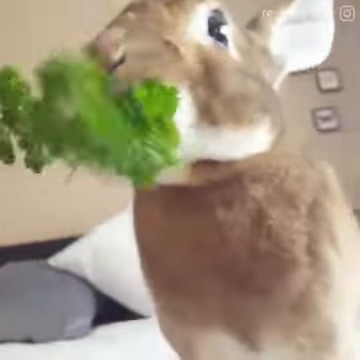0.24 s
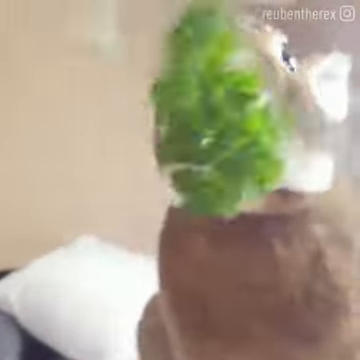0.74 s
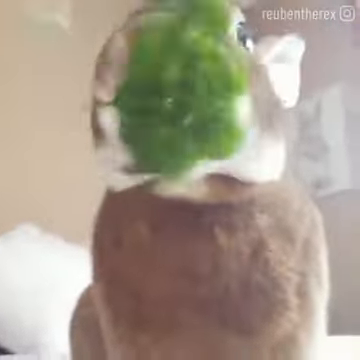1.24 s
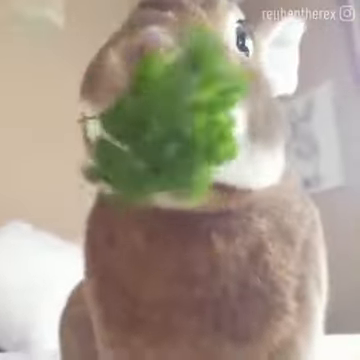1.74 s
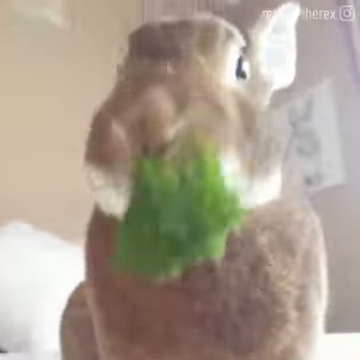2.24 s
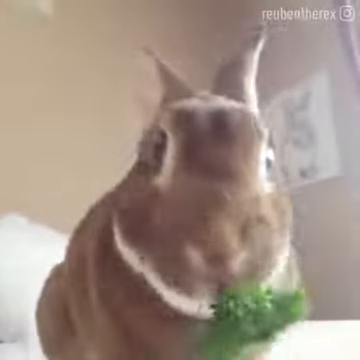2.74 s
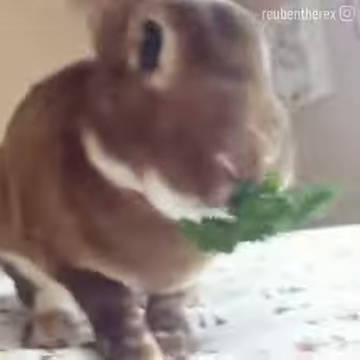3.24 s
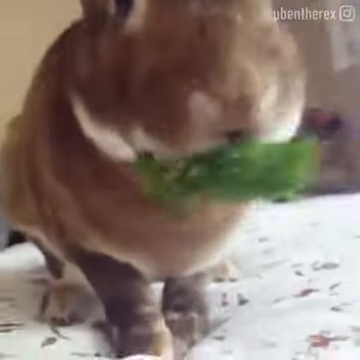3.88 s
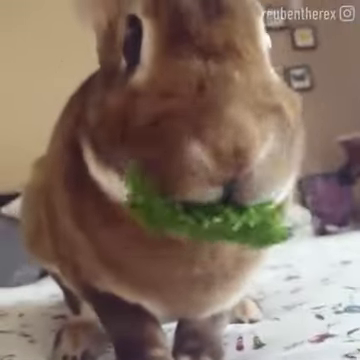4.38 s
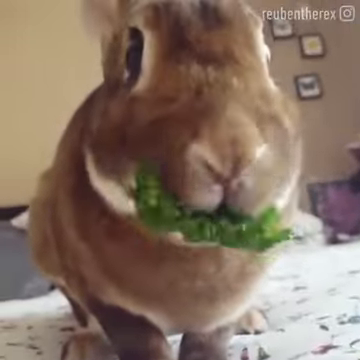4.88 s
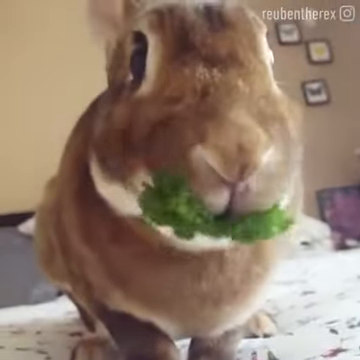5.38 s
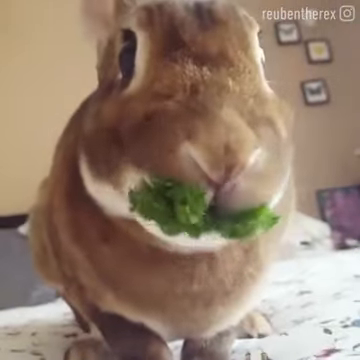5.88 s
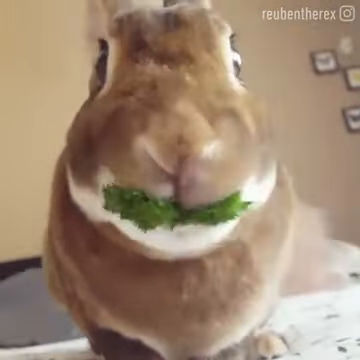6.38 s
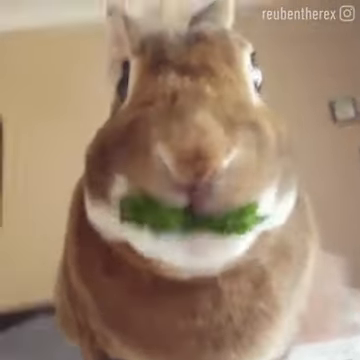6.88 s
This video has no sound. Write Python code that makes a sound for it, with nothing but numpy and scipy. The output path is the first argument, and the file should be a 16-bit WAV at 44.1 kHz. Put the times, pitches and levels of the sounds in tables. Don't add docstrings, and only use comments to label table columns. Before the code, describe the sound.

A rabbit eats leafy greens a hand's breadth from a stereo microphone in a quiet bedroom, over a low wavering air hum and faint steady hiss. From 0 to 2.2 seconds it bites about four times a second: bright, crackling leaf tears, thick stems snapping in little clusters and a small hollow crunch of the closed mouth, strongest near 0.1 and 1.0. From about 2.3 to 4 the head is lowered and bites become softer, drier and shorter-tailed, with thin clean stem ticks and muffled pops. From 4.1 to 7 the crunches firm up again at the same steady pace. Between bites, lips draw leaves in with soft rustles; faint low thumps come from jolted bedding. At 6.73 a fingertip knocks the microphone: one abrupt, very loud click with a low thump, mainly left, gone almost instantly. Two last bites follow, leaning left.

```python
import sys
import numpy as np
from scipy import signal
from scipy.io import wavfile
from scipy.ndimage import uniform_filter1d

SR = 44100
rng = np.random.default_rng(int(sys.argv[2]) if len(sys.argv) > 2 else 0)


def volts_from_db(level):
    exponent = np.asarray(level, float) / 20
    return 10 ** exponent


def digitize_waveform(pressure):
    field = np.atleast_2d(pressure).T
    bounded = np.clip(field, -1, 1)
    quanta = np.round(bounded * 32767).astype(np.int16)
    wavfile.write(sys.argv[1], SR, quanta)


N = 313992

# frequency in Hz, level in dB per Hz.
ROOM_SPECTRUM = [(15, -23), (25, 9.5), (48, -7.5), (112, -10), (417, -17.5), (893, -20.5), (1190, -22.5),
                 (1360, -20), (2840, -27.5), (4000, -28.5), (6760, -29.5), (7920, -30.5), (12100, -32),
                 (13400, -36.5)]
ROOM_DB = -64
# frequency in Hz, correlation from 0 to 1.
PORT_LIKENESS = [(60, 0.95), (130, 0.85), (290, 0.73), (640, 0.59), (1400, 0.15), (3080, 0.45),
                 (6780, 0.16), (14900, 0.17)]
# time in seconds, level in dB.
HUM_DRIFT = [(0.0, -68.5), (0.4, -71.5), (0.71, -64.5), (1.21, -71), (1.64, -69.5), (2.38, -69),
             (3.03, -66.5), (4.9, -71.5), (5.15, -70.5), (5.61, -68.5), (6.09, -71.5), (6.39, -69),
             (6.76, -72), (7.0, -68.5), (7.12, -75)]
# centre with the head up in Hz, centre with it down in Hz, half width in Hz, depth in dB.
REFLECTION_DIPS = [(3750, 4300, 130, -4), (7950, 6300, 150, -2.5), (10750, 11200, 150, -3.5)]
# frequency in Hz, width in Hz, level in dB.
ROOM_MODES = [(81.7, 32, -79.5), (131.3, 30, -77.5), (223, 20, -80.5)]
# start in seconds, level in dB, frequency in Hz.
BEDDING_THUDS = [(0.099, -62, 96.9), (0.69, -65, 110), (0.989, -59, 105), (1.184, -55, 121),
                 (1.65, -59, 122), (2.129, -59, 121), (2.23, -59, 80.7), (2.829, -62, 86.1),
                 (3.131, -57, 86.1), (3.568, -59.5, 127), (4.014, -62, 94.2), (4.921, -65, 102),
                 (5.154, -66, 110), (5.449, -56, 132)]
# frequency in Hz, level in dB, 60 dB decay in seconds.
CASE_RINGS = [(1420, -31, 0.017), (1700, -30.5, 0.012), (1850, -19, 0.0058), (4510, -33, 0.0075),
              (2310, -27, 0.0085), (5300, -29, 0.0027), (6260, -44, 0.0024), (8800, -36.5, 0.0031)]
# time after the knock in seconds, level in dB.
RING_STARTS = [
    (-.0027, -20),
    (-.0017, -13),
    (-.0009, -9),
    (-.0001, 0),
    (.003, -17),
]
# time in seconds, head lowered from 0 to 1, left over right fizz in dB.
HEAD = [
    (0, 0.02, 2),
    (1, 0.27, 4),
    (2.2, 0.16, 1.5),
    (2.6, 1, -0.5),
    (4.5, 0.93, -1.5),
    (7.2, 0.97, 3),
]
# frequency in Hz, level in dB per Hz.
FIZZ_UP = [(1650, -10), (2800, -9), (3180, -7.5), (3550, -10.5), (3850, -18), (4300, -8), (4740, -2),
           (5430, -6.5), (7170, 0.5), (7690, -5), (7970, -18), (8380, -8.5), (9330, 0), (10700, -13.5),
           (11600, -5), (13100, -8), (15400, -19.5)]
FIZZ_DOWN = [(1650, -39), (2800, -1.5), (3400, -5), (4180, -4.5), (5000, -7), (5440, -6.5), (6070, -1.5),
             (6730, 3), (8000, -1), (8820, -0.5), (10900, -2.5), (11900, -3.5), (13600, -5.5),
             (14600, -11.5)]
# frequency in Hz, level in dB per Hz.
MOUTH_UP = [(180, -52), (300, -14.5), (483, -6.5), (588, -5.5), (956, -5.5), (1060, -5), (1840, -8),
            (2010, -10.5), (2380, 1), (3200, -13.5), (4160, -41), (7040, -120)]
MOUTH_DOWN = [(180, -42), (300, -7.5), (468, -18.5), (528, -9), (724, -8), (1090, -7.5), (1820, -1),
              (2030, -8.5), (2550, -18), (3200, -11), (4160, -18.5), (7040, -120)]
# time in seconds, tick in dB, mouth ring in dB, ring in Hz.
STEM_BREAKS = [(0.11, -44, -65, 690), (0.1251, -39, -44, 784), (.136, -47, -46, 1390),
               (0.3446, -53.5, -41, 2300), (0.356, -62, -43, 2650), (0.371, -47, -59, 1860),
               (0.5312, -44.5, -61, 1310), (.5275, -54, -65, 2000), (.552, -56, -65, 860),
               (0.5585, -45, -52, 2560), (.5635, -52, -50, 2310), (.766, -43.5, -52, 840),
               (0.9784, -47, -56, 2310), (0.9964, -41.5, -41.5, 700), (1.007, -48, -39.5, 960),
               (1.2075, -53, -70, 7000), (1.2125, -52, -58, 7000), (1.213, -48.5, -76, 4480),
               (1.2193, -57, -61, 2300), (1.2355, -50, -62, 2400), (1.2535, -57, -57, 2110),
               (1.3207, -52.5, -56.5, 1460), (1.4364, -51, -63, 1700), (1.444, -52.5, -49, 1080),
               (1.679, -50.5, -51.5, 1670), (1.7105, -51.5, -51.5, 774), (1.73, -58, -59, 1020),
               (1.9216, -66, -58, 2330), (1.9345, -56, -49.5, 780), (1.955, -52.5, -48.5, 1510),
               (2.141, -52, -53, 930), (4.1189, -44.5, -45, 1960), (4.14, -55, -51, 1850),
               (5.806, -59, -59, 1910), (5.8147, -53.5, -62, 1650), (6.25, -50.5, -50, 1740),
               (6.787, -61, -49, 1420)]
# time in seconds, tick in dB, mouth ring in dB, ring in Hz.
STEM_CUTS = [(.3323, -62, -50, 2080), (.9876, -54, -48, 2050), (1.9018, -47.5, -45, 1720),
             (2.5325, -66, -56, 3640), (2.6175, -53.5, -72, 1740), (2.6586, -51.5, -41, 2075),
             (2.708, -58, -45.5, 1730), (3.1632, -51.5, -45, 1850), (3.6019, -45.5, -55, 2630),
             (3.6207, -51.5, -67, 880), (3.6495, -44, -43, 4000), (4.0548, -57, -55, 1890),
             (4.316, -53, -52, 1610), (4.529, -48, -46.5, 3350), (4.633, -63, -58, 3930),
             (4.7945, -54, -68, 1670), (4.8034, -50, -51, 1590), (4.813, -64, -60, 1830),
             (5.008, -42.5, -57, 2210), (5.0661, -48.5, -48, 805), (5.4647, -62, -58, 1830),
             (5.5155, -52.5, -51, 1700), (5.7504, -47, -57, 880), (5.754, -54, -57, 2000),
             (5.9864, -53.5, -55, 1680), (6.489, -42.5, -54, 4060), (6.636, -62, -55, 2570),
             (6.7692, -51.5, -43, 1140), (6.992, -56, -65, 1870), (7.0274, -54, -50, 2010),
             (7.046, -65, -64.5, 970)]
# time in seconds, mouth ring in dB, ring in Hz.
STEM_POPS = [(.1457, -52, 780), (1.4529, -51, 1570), (1.4635, -50, 1410), (2.382, -56, 1870),
             (2.6516, -49, 1890), (2.67, -45.5, 1890), (2.6932, -48, 1560), (2.717, -50, 1660),
             (3.4253, -55, 1610), (4.1137, -51, 1950), (4.1183, -44.5, 220), (4.3048, -54, 1780),
             (4.351, -56, 1460), (4.534, -47, 1520), (4.561, -46.5, 1710), (4.5753, -44, 1600),
             (4.82, -46, 1830), (4.833, -51, 1500), (5.042, -47, 1500), (5.051, -45, 1850),
             (5.7626, -54, 810), (5.7978, -48.5, 1940), (6.0005, -53, 1230), (6.2843, -48, 1950),
             (6.5272, -53, 1370), (6.76, -46, 1590)]
# middle in seconds, half length in seconds, leaf rustle in dB.
LIP_PULLS = [(0.284, 0.011, -61), (0.477, 0.032, -63.5), (0.73, 0.035, -71), (0.925, .025, -69),
             (1.177, 0.036, -62.5), (1.387, 0.032, -72), (1.588, 0.05, -70), (1.849, 0.031, -64.5),
             (2.084, 0.045, -64), (2.542, 0.025, -73), (2.737, 0.025, -68), (3.083, 0.018, -72),
             (3.566, 0.034, -70), (4.077, 0.021, -59.5), (4.38, 0.019, -65.5), (4.775, 0.03, -61),
             (4.973, 0.033, -67.5), (5.23, 0.046, -65), (5.447, 0.017, -63), (5.69, 0.013, -64.5)]
# jaw closes at seconds, grind length in seconds, leaf fizz in dB, mouth crunch in dB.
BITES = [(0.122, 0.015, -51.5, -50.5), (0.32, 0.031, -55, -53), (0.534, 0.034, -54.5, -51),
         (0.748, 0.053, -55.5, -56), (0.983, 0.014, -48, -48.5), (1.21, 0.043, -53.5, -57.5),
         (1.439, 0.015, -52, -55.5), (1.662, 0.049, -56, -58.5), (1.904, 0.024, -55, -55),
         (2.13, 0.012, -55, -55.5), (2.348, 0.099, -66.5, -63), (2.629, 0.074, -61, -55.5),
         (2.894, 0.055, -75, -62.5), (3.122, 0.068, -60, -56), (3.344, 0.074, -64.5, -59),
         (3.6, 0.069, -63, -60), (3.809, 0.099, -69.5, -65), (4.112, 0.023, -58, -53),
         (4.29, 0.065, -63.5, -60), (4.541, 0.03, -59, -53), (4.804, 0.023, -57, -51.5),
         (4.996, 0.075, -62.5, -56), (5.259, 0.066, -65.5, -61), (5.496, 0.058, -59.5, -57.5),
         (5.745, 0.075, -62.5, -54.5), (5.985, 0.064, -57.5, -55), (6.247, 0.043, -57, -54.5),
         (6.511, 0.039, -61, -57.5), (6.766, 0.035, -55.5, -52.5), (6.98, 0.068, -63, -60)]
# head up in dB/s, head down in dB/s.
RELEASE_DB_PER_S = ((248, 570), (220, 680))

CLOSE_DB_PER_S = 1095
SWELL_DB = (0, 7.5)
SETTLE_DB, SETTLE_SHARE = -8, 0.59
PULL_CRUNCH_DB = -10.5
BREAK_MS = (1.44, 0.86)
CUT_MS, POP_MS, POP_TICK_DB = 0.63, 1.2, -8.5
KNOCK_S, THUD_S = 6.73268, .008


def read(points, hz):
    f, value = np.transpose(points)
    return np.interp(np.log(hz + 1), np.log(f + 1), value)


def evened(x):
    return x / np.sqrt(np.mean(x ** 2) + 1e-20)


def highpass(x, hz):
    return signal.sosfilt(signal.butter(2, hz, "high", fs=SR, output="sos"), x)


def colour(points):
    level_db = np.maximum(read(points, abs(np.fft.fftfreq(4096, 1 / SR))), -90)
    log_gain = np.log(volts_from_db(level_db))
    taps = np.fft.ifft(np.exp(np.conj(signal.hilbert(log_gain)))).real[:1024]
    return taps / np.linalg.norm(taps)


def posture(column):
    head = np.array(HEAD)
    return np.interp(np.arange(N) / SR, head[:, 0], head[:, column])


def head_low():
    return np.clip(posture(column=1), 0, 1)


def by_head(drive, up, down):
    low = head_low()
    raised = signal.oaconvolve(drive * np.sqrt(1 - low), colour(up))
    lowered = signal.oaconvolve(drive * np.sqrt(low), colour(down))
    return (raised + lowered)[:N]


def scatter(x, wet, t60):
    t = np.arange(2000) / SR
    taps = rng.standard_normal((2, len(t))) * volts_from_db(-60 * t / t60)
    taps *= np.sqrt(np.clip(wet, 0, 1)) / np.linalg.norm(taps, axis=1, keepdims=True)
    taps[:, 0] = np.sqrt(1 - np.clip(wet, 0, 1))
    return signal.oaconvolve(x[None], taps, axes=1)[:, :N]


def crackle(per_s, spread_db, clump_db, clump_s):
    hit, size = rng.random(N), rng.exponential(1, N)
    sign, clump = rng.standard_normal(N), rng.standard_normal(N)
    span = max(int(clump_s * SR), 2)
    clump = evened(uniform_filter1d(uniform_filter1d(clump, span), span))
    size_db = spread_db * np.minimum(size, 4) + clump_db * clump
    return evened((hit < per_s / SR) * np.sign(sign) * volts_from_db(size_db))


def patchy(x, patch_db):
    z = signal.stft(x, nperseg=256)[2]
    patches = rng.standard_normal(z.shape[::-1]).T
    patches = uniform_filter1d(uniform_filter1d(patches, size=12, axis=0), size=5, axis=1)
    gain_db = patch_db * evened(patches) - patch_db ** 2 / 8.9
    return signal.istft(z * volts_from_db(gain_db), nperseg=256)[1][:N]


def room_tone():
    frames, hz = N // 256 + 5, np.fft.rfftfreq(1024, 1 / SR)
    a, b, c, d, patches = rng.standard_normal((frames, 513, 5)).T
    patches = evened(uniform_filter1d(uniform_filter1d(patches, 14, 0), 20, 1))
    same = np.clip(read(PORT_LIKENESS, hz), -1, 1)[:, None]
    left = a + 1j * b
    z = np.array([left, same * left + np.sqrt(1 - same ** 2) * (c + 1j * d)])
    down = head_low()[np.minimum(np.arange(frames) * 256, N - 1)]
    shade = (hz[:, None] - 3800 - 1700 * down) / (450 + 1100 * down)
    z *= volts_from_db(-3.0 * np.exp(-shade ** 2))
    for up_hz, down_hz, width, db in REFLECTION_DIPS:
        centre = up_hz + (down_hz - up_hz) * down
        z *= volts_from_db(db * np.exp(-((hz[:, None] - centre) / width) ** 2))
    low = 1 / (1 + (hz / 350) ** 2)[:, None]
    drift_db = np.interp(np.arange(frames) * 256 / SR, *np.transpose(HUM_DRIFT))
    moving_db = 1.6 * (1 - low) * patches + low * (drift_db - drift_db.mean())
    z *= volts_from_db(read(ROOM_SPECTRUM, hz)[:, None] + moving_db)
    tone = evened(signal.istft(z, nperseg=1024, noverlap=768)[1][:, :N])
    return volts_from_db(np.array([[ROOM_DB + 0.97], [ROOM_DB - .7]])) * highpass(tone, 58.)


def room_modes():
    out = np.zeros(N)
    for hz, width, db in ROOM_MODES:
        ringing = signal.lfilter(*signal.iirpeak(hz, hz / width, SR), rng.standard_normal(N))
        out += volts_from_db(db) * evened(ringing)
    return out


def thuds():
    t, out = np.arange(N) / SR, np.zeros(N)
    for s, db, hz in BEDDING_THUDS:
        bump = np.exp(-((t - s - THUD_S) / THUD_S) ** 2)
        out += volts_from_db(db) * bump * np.sin(2 * np.pi * hz * (t - s))
    return out


def knock():
    t = np.arange(N) / SR - KNOCK_S
    press = np.sin(np.pi / 2 * np.clip((t + .00005) / .00058, 0, 1)) ** 2
    step = highpass(volts_from_db(1.6) * press, 110.)
    step = step + volts_from_db(-35) * signal.lfilter(*signal.iirpeak(95., 2.5, SR), step)
    ring = np.zeros(N)
    for lag, start_db in RING_STARTS:
        u = np.maximum(t - lag, 0)
        soft = 1 - np.exp(-u * 12000)
        for hz, db, t60 in CASE_RINGS:
            ring -= soft * volts_from_db(db + start_db - 60 * u / t60) * np.sin(2 * np.pi * hz * u)
    ring = highpass(ring, 800.)
    return np.array([step + volts_from_db(7.5) * ring, volts_from_db(-51) * step + ring])


def snaps():
    low = posture(column=1)
    breaks = [(*row, np.interp(low[int(row[0] * SR)], (0, 1), BREAK_MS)) for row in STEM_BREAKS]
    cuts = [(*row, CUT_MS) for row in STEM_CUTS]
    pops = [(s, db + POP_TICK_DB, db, hz, POP_MS) for s, db, hz in STEM_POPS]
    return breaks + cuts + pops


def stems():
    s, tick_db, ring_db, hz, ms = np.transpose(snaps())[:, :, None]
    t = np.arange(-200, 500) / SR
    breaks, chance = rng.standard_normal((len(s), len(t))), rng.standard_normal((len(s), 2))
    breaks[:, 200] = 2.9 * np.sign(chance[:, 1])
    shape = np.exp(-abs(t / (np.maximum(ms, .1) / 1000 * .65)) ** 0.42)
    fade = np.exp(-abs(t / ((ms + 0.24) / 1000 * np.where(t < 0, .3, .8))))
    swing = fade * np.sin(2 * np.pi * (hz * t + chance[:, :1]))
    at = np.round(s * SR).astype(int) + np.arange(len(t)) - 200
    out = np.zeros((2, N))
    for port, side in enumerate((.5, -.5)):
        lean_db = side * 2.0 * chance[:, 1:]
        tick, ring = np.zeros((2, N))
        np.add.at(tick, at, volts_from_db(tick_db + lean_db + 3 / (ms + .5)) * breaks * shape)
        np.add.at(ring, at, volts_from_db(ring_db + lean_db + 4.0) * swing)
        bright = by_head(tick, FIZZ_UP, FIZZ_DOWN) + volts_from_db(-8.5) * by_head(tick, MOUTH_UP, MOUTH_DOWN)
        out[port] = scatter(bright, 0.17, 0.029)[port] + scatter(ring, 0.32, 0.045)[port]
    return out * volts_from_db(np.outer([.5, -.5], posture(column=2)))


def pulls():
    t, gain = np.arange(N) / SR, np.zeros(N)
    for s, half, db in LIP_PULLS:
        gain += volts_from_db(db) * np.cos(np.pi / 2 * np.clip((t - s) / (1.15 * half), -1, 1))
    return gain


def effort(layer):
    t, gain = np.arange(N) / SR, np.zeros(N)
    up, down = RELEASE_DB_PER_S[layer]
    release = up + (down - up) * head_low()
    for start, length, *level_db in BITES:
        near = slice(max(int((start - .1) * SR), 0), int((start + .3) * SR))
        u = t[near] - start
        close = CLOSE_DB_PER_S * np.minimum(u, 0)
        grind = SWELL_DB[layer] * (np.clip(u / length, 0, 1) - 1)
        fall = release[near] * np.maximum(u - length, 0)
        settle = np.maximum(-fall, SETTLE_DB - SETTLE_SHARE * fall)
        gain[near] += volts_from_db(level_db[layer] + grind + close + settle)
    return gain + pulls() * volts_from_db(PULL_CRUNCH_DB * layer)


def mouth():
    breaks = crackle(per_s=2200, spread_db=2.4, clump_db=3.4, clump_s=.004)
    crunch = by_head(effort(layer=1) * breaks, MOUTH_UP, MOUTH_DOWN)
    return scatter(crunch, 0.38, 0.14) * volts_from_db(-2.5)


def leaves():
    tears = crackle(per_s=9000, spread_db=1.8, clump_db=4.45, clump_s=0.002)
    fizz = by_head(effort(layer=0) * tears, FIZZ_UP, FIZZ_DOWN)
    return scatter(patchy(fizz, 3.8), 0.66, 0.081) * volts_from_db(np.outer([.5, -.5], posture(column=2)) - 3.0)


def scene():
    background = room_tone() + room_modes() + thuds()
    return background + knock() + stems() + mouth() + leaves()


def top_cut(x):
    return signal.sosfilt(signal.butter(12, 15500, fs=SR, output="sos"), x)


def record(dry):
    return top_cut(dry)


dry = scene()
out = record(dry)
digitize_waveform(out)
```